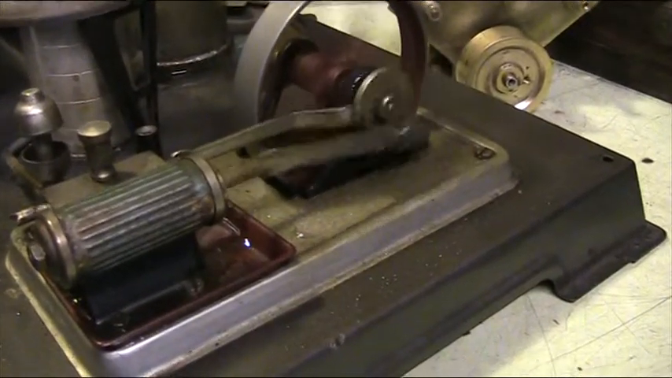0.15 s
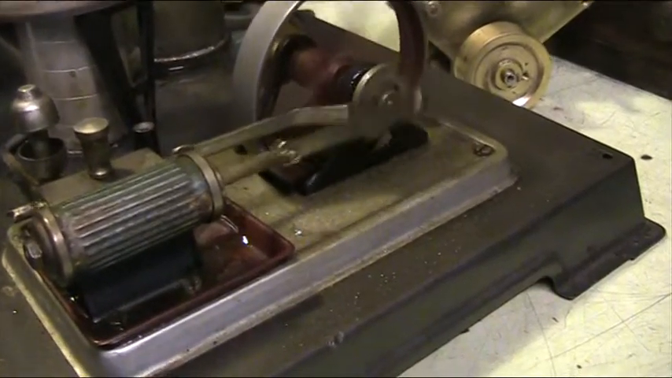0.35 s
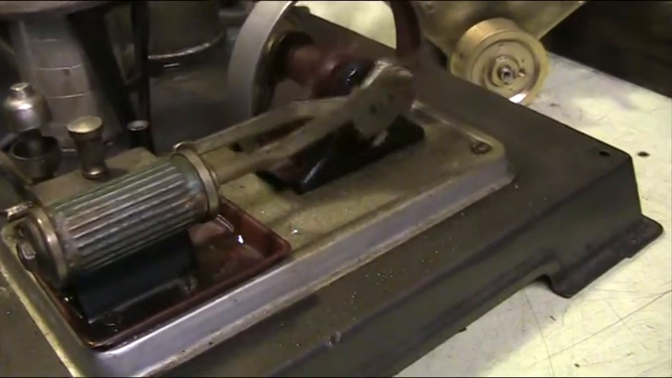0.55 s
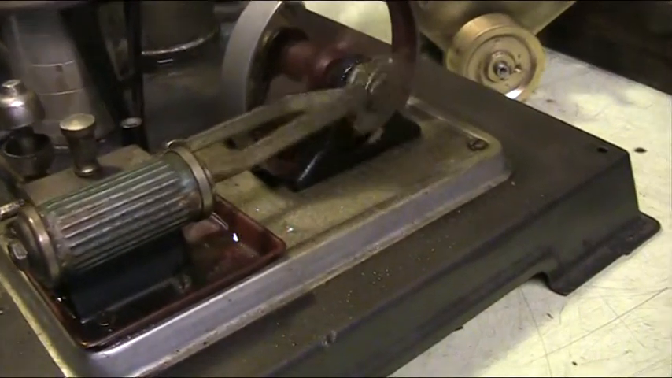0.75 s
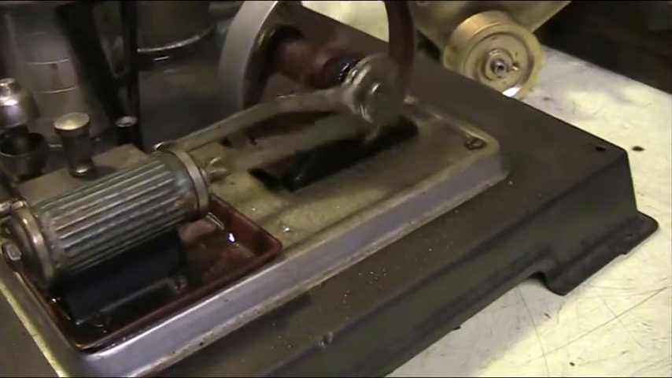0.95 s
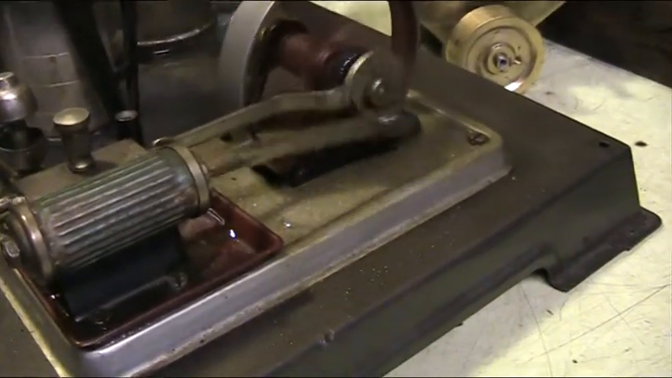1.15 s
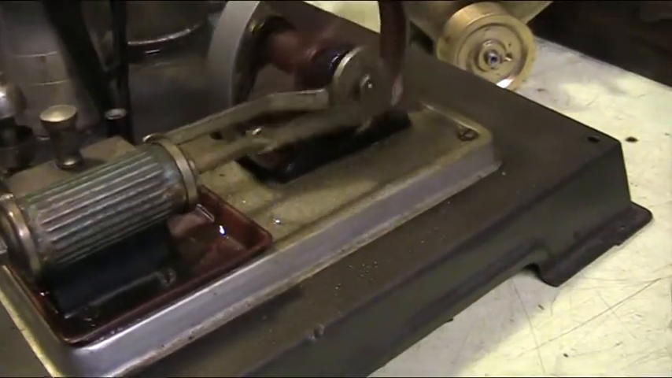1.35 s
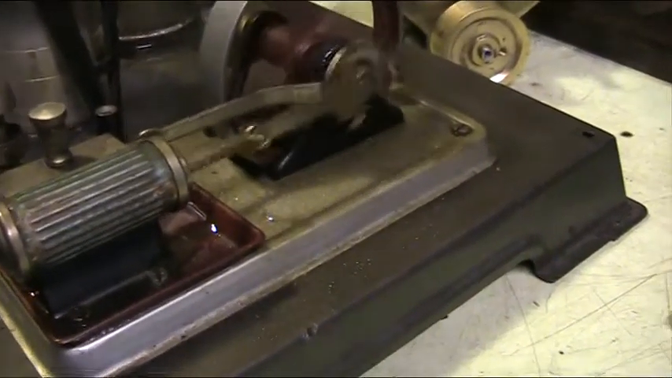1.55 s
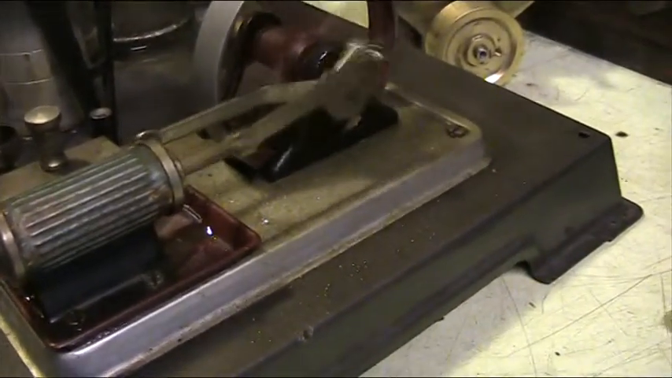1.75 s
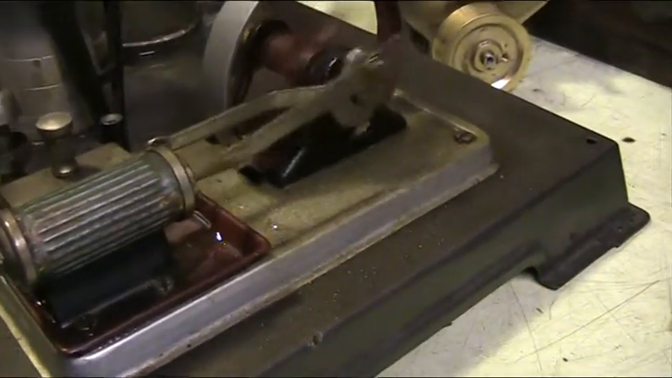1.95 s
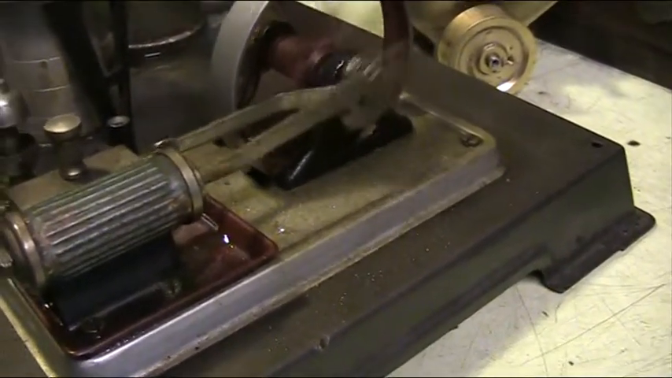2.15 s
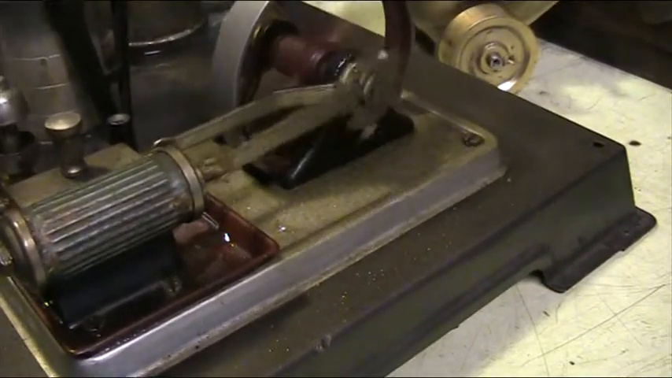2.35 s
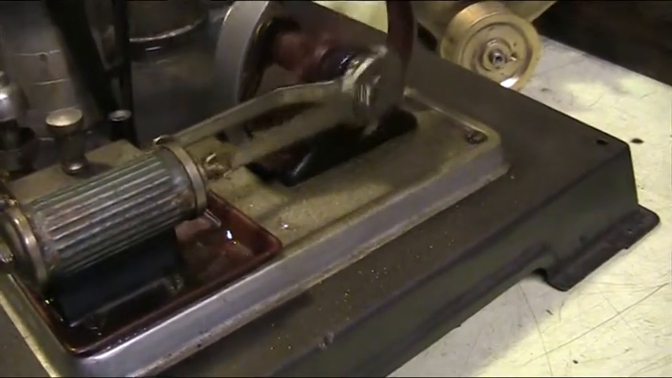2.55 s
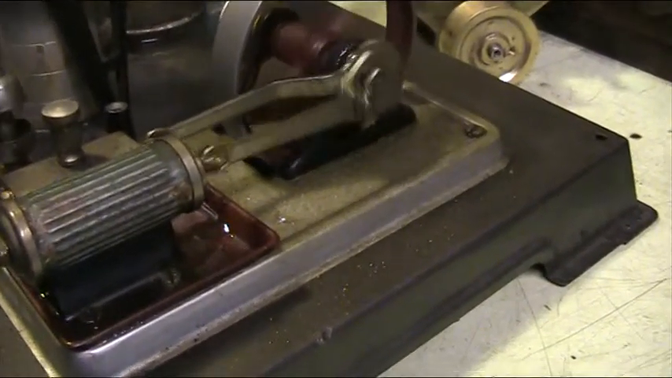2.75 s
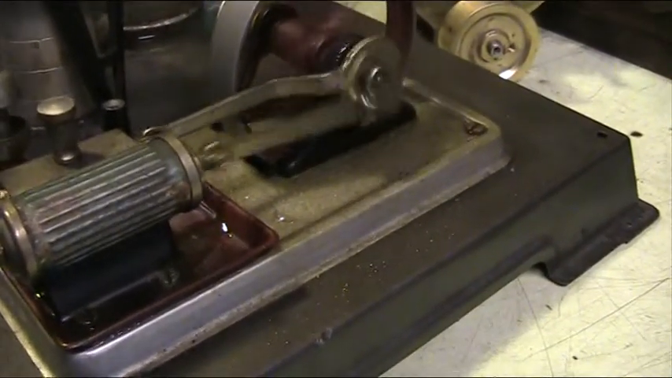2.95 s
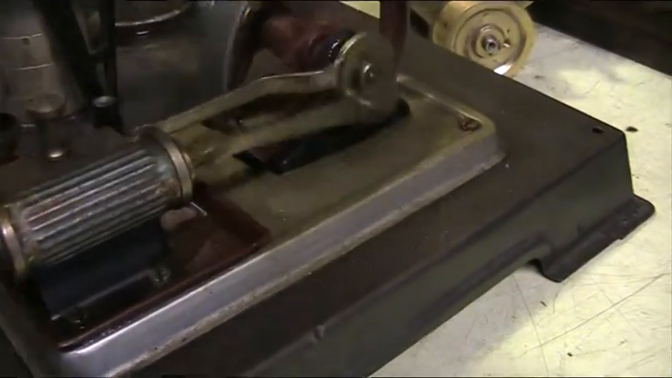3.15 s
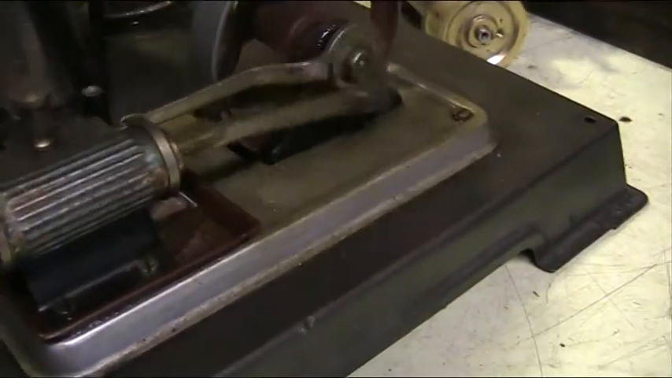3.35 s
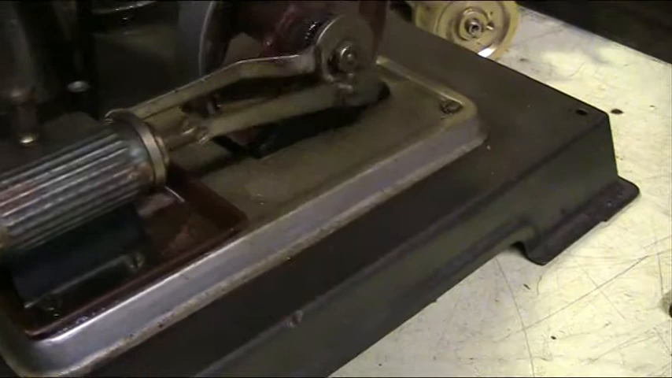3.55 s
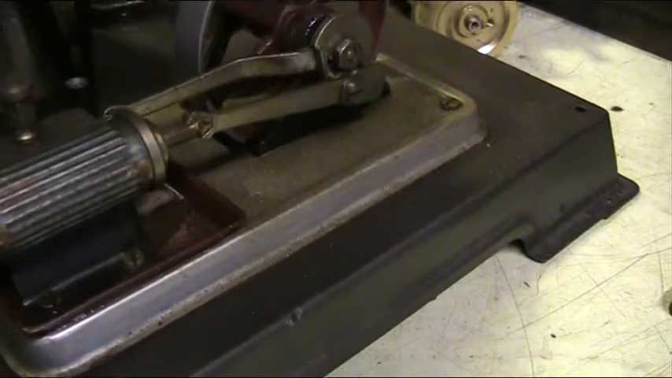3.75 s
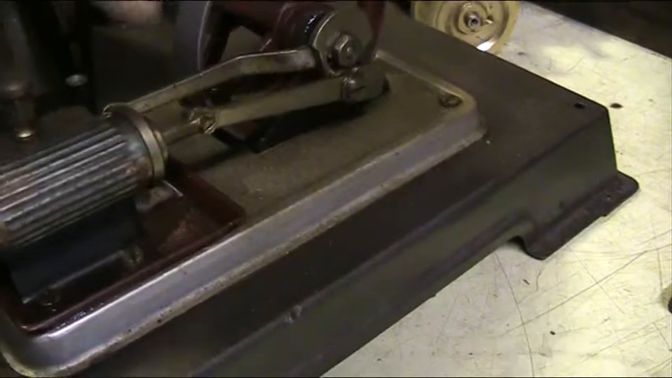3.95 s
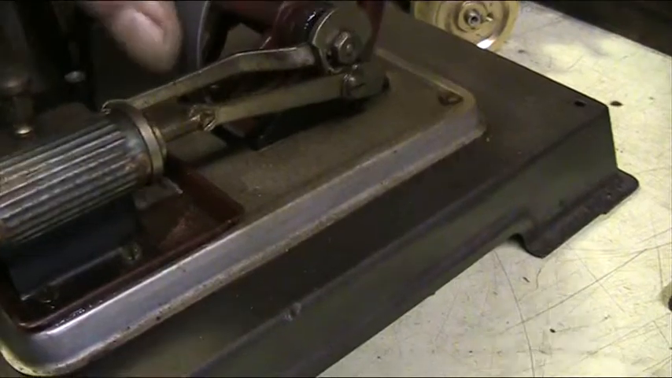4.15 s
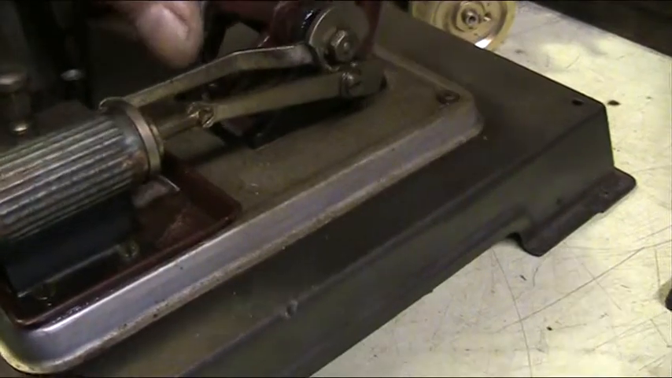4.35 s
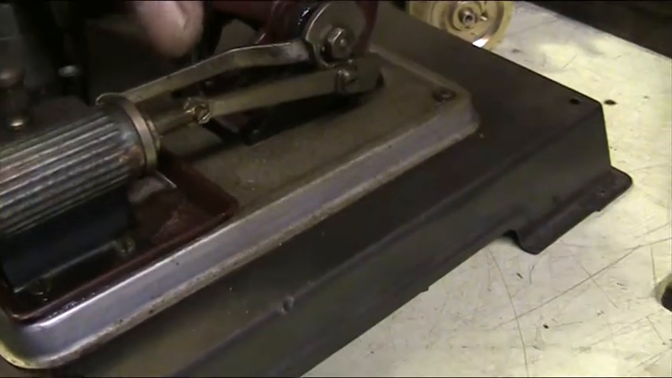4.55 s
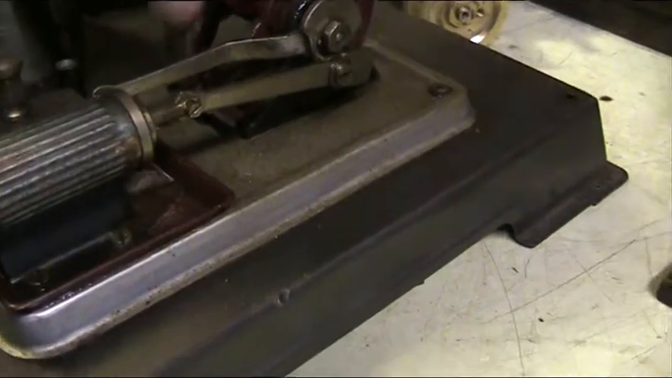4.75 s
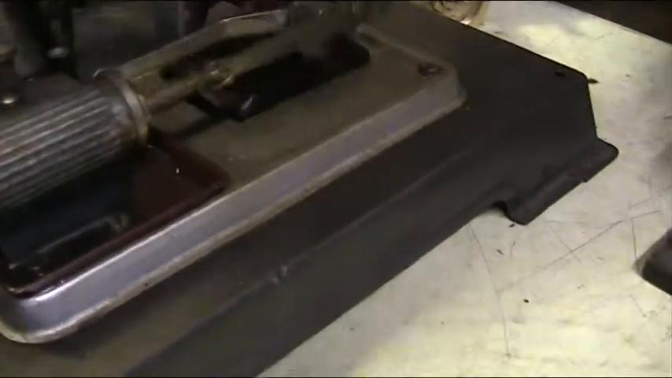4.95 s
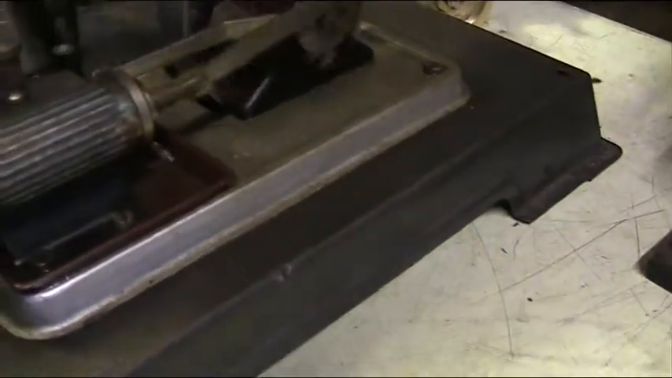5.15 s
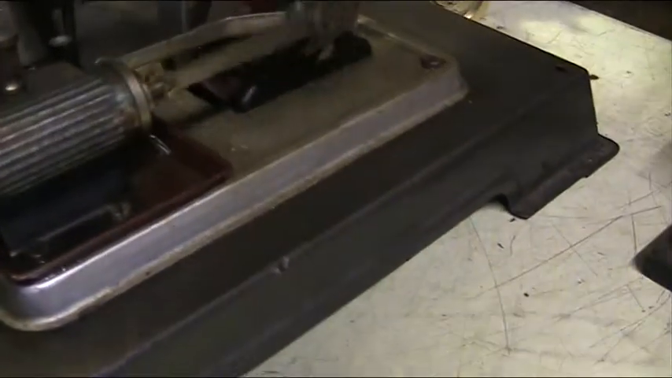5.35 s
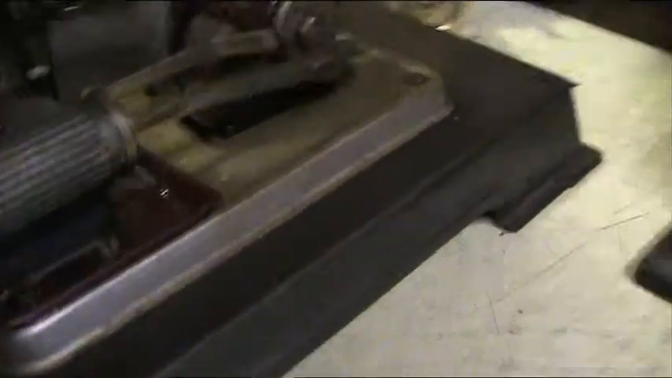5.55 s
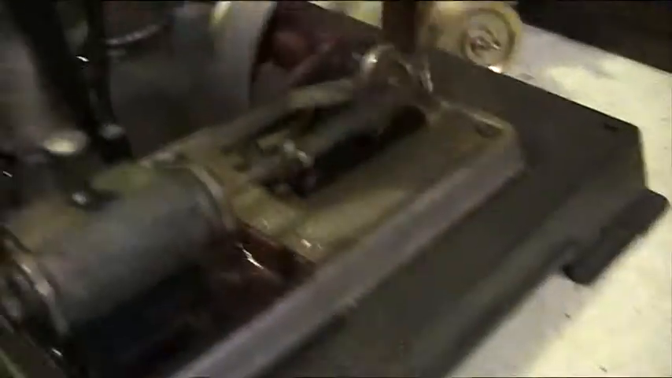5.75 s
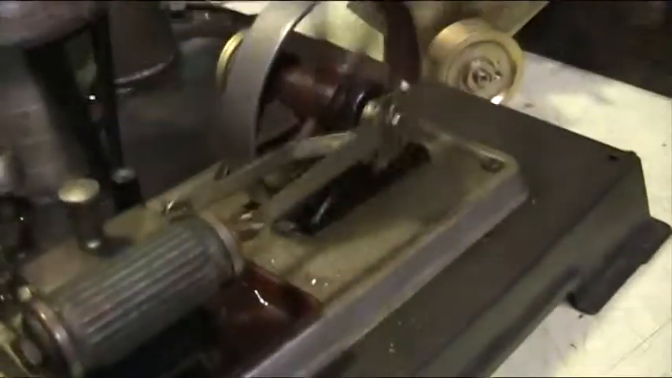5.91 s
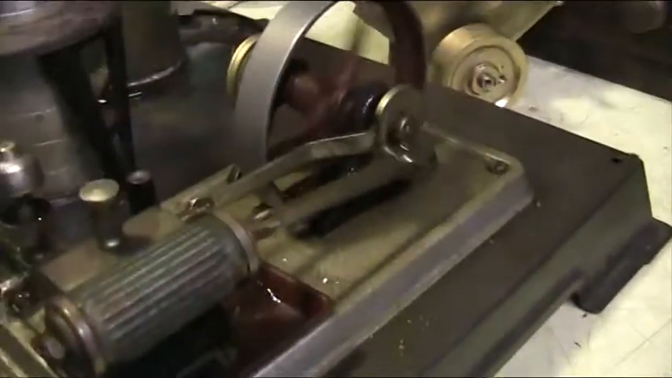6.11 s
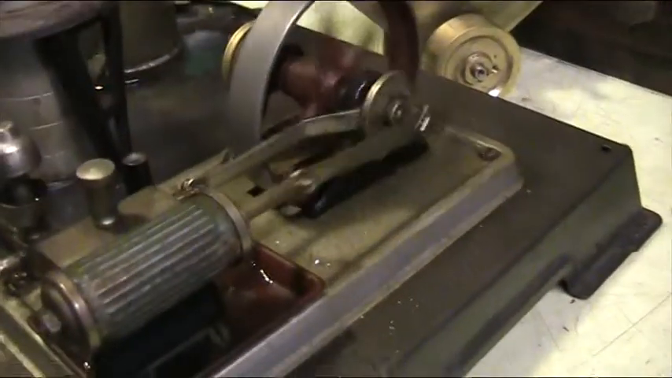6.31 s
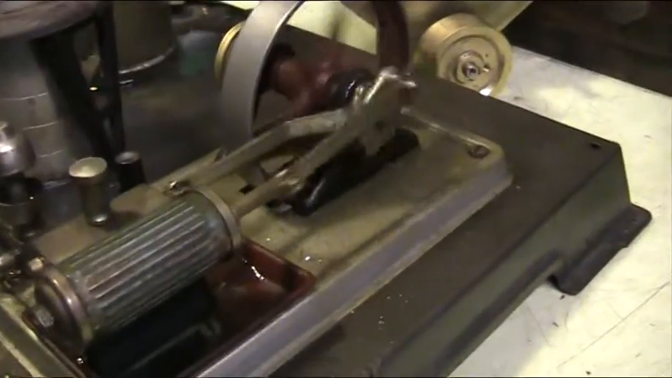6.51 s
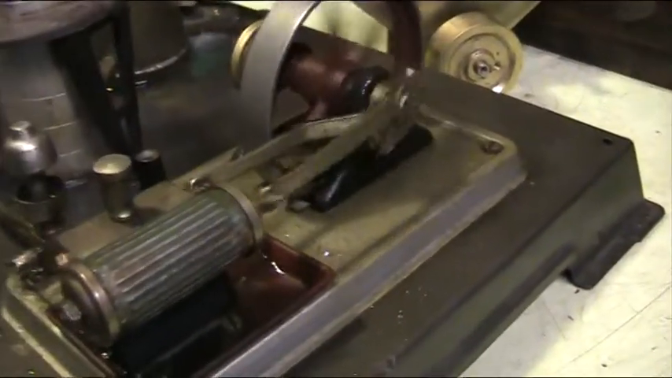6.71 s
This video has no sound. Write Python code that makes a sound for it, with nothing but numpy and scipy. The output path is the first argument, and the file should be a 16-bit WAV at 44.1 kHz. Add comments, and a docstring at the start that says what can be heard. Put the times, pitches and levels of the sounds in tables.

```python
"""A toy steam engine runs on a workbench, close to a stereo pair of microphones in a workshop.
Once a turn its crank knocks and the tin base rings and thuds. Steam hisses from the fittings
throughout; just past mid-turn the valve switches with a spurt and the port leaks until the knock.
The engine stalls after 3.5 s, is pushed on with a clack at 5 s and then runs more slowly, spitting."""
import sys
import numpy as np
from scipy import signal
from scipy.fft import rfft, irfft, next_fast_len
from scipy.io import wavfile
from scipy.ndimage import uniform_filter1d, map_coordinates

SR = 44100
rng = np.random.default_rng(int(sys.argv[2]) if len(sys.argv) > 2 else 0)


def digitize_waveform(pressure):
    """Quantize a signal to 16-bit integers and store it at the path in sys.argv[1].

    Rows of a 2-D input are taken as channels; values are limited to [-1, 1].
    """
    field = np.atleast_2d(pressure).T
    bounded = np.clip(field, -1, 1)
    quanta = np.round(bounded * 32767).astype(np.int16)
    wavfile.write(sys.argv[1], SR, quanta)


N = 298998

# one knock a turn, in relative levels: t/s, crack/dB, base ring/dB, lead-in rattle/dB
STROKES = [(0.0853, -9, -24, -21), (0.2552, -11.5, -23, -24.5), (0.4253, -7.5, -24, -31),
           (0.5925, -5.5, -22, -34), (0.758, -9, -21.5, -26), (0.9253, -13.5, -26, -22.5),
           (1.0945, -10.5, -23, -20), (1.267, -28, -26, -43), (1.4407, -11.5, -25, -20),
           (1.616, -9.5, -26.5, -23), (1.7956, -12, -22, -20.5), (1.9793, -11.5, -24, -21),
           (2.166, -12.5, -22, -19), (2.3523, -6.5, -25.5, -33), (2.5368, -9.5, -24.3, -22.5),
           (2.7244, -10, -25, -26.5), (2.9157, -5.5, -25, -26), (3.1069, -13, -26.5, -23.5),
           (3.2962, -9, -21.5, -33), (3.4879, -10, -22, -36), (5.057, -26, -26, -26.5),
           (5.3209, -26, -26, -27.5), (5.5877, -36, -25.5, -27), (5.8574, -12, -24.5, -21.5),
           (6.1225, -29, -27, -24), (6.388, -31, -25.5, -24.5), (6.655, -28, -25, -35)]
# the rod's scrape through its slack: level/dB for a brisk, a labouring and a slow turn
SLACK_DB = [-38.5, -30, -49]
SLACK_LEAD_S = .021  # the rod leaves its seat this long before the knock


def amp(db):
    """Decibels to gain."""
    return 10 ** (np.asarray(db) / 20)


def unit(x):
    """Scale to rms 1."""
    return x / np.sqrt(np.mean(x ** 2) + 1e-20)


def along(points, hz):
    """Interpolate (f/Hz, value) points on a log axis."""
    f, v = np.transpose(points)
    return np.interp(np.log(hz + 1), np.log(f + 1), v)


def clock():
    """The time of every sample."""
    return np.arange(N) / SR


def curve(points):
    """Interpolate (t/s, value) points at every sample."""
    return np.interp(clock(), *np.transpose(points))


def wobble(rate):
    """A smooth random curve, rate knots a second."""
    return map_coordinates(rng.standard_normal(int(N * rate / SR) + 4), [clock() * rate])


def fade(t60):
    """An exponential decay, a quarter second long."""
    return amp(-60 * np.arange(SR // 4) / SR / t60)


def swell(s, half_s):
    """A bell-shaped swell around time s."""
    return np.exp(-((clock() - s) / half_s) ** 2)


def add(track, s, sound):
    """Mix a sound in at time s."""
    start = max(round(s * SR), 0)
    part = track[start:start + len(sound)]
    part += sound[:len(part)]


def filtered(x, response):
    """Filter x by a response, a function of frequency."""
    m = next_fast_len(N + SR // 2)
    return irfft(rfft(x, m) * response(np.fft.rfftfreq(m, 1 / SR)), m)[..., :N]


def colour(points):
    """The response of a spectrum (f/Hz, level/dB)."""
    return lambda hz: amp(along(points, hz))


def resonant(modes):
    """The response of resonances (f/Hz, width/Hz, level/dB)."""
    return lambda hz: np.sqrt(sum(amp(db) ** 2 * (hz * w) ** 2 / ((f * f - hz * hz) ** 2 + (hz * w) ** 2)
                                  for f, w, db in modes))


def noise(response):
    """Coloured noise of rms 1."""
    return unit(filtered(rng.standard_normal(N), response))


def wide(response):
    """Stereo noise, widest in the high treble."""
    # stereo width of steady sounds: f/Hz, side re mid/dB
    width = [(60, -11), (400, -8), (1400, -13.5), (3100, -17.5), (6500, -9), (10000, -7), (15000, -2.5)]
    side = filtered(noise(response), colour(width))
    return noise(response) + np.array([side, -side])


def turns():
    """The time of each knock and the length of the turn that it ends, in seconds."""
    knock_s = [row[0] for row in STROKES]
    return zip(knock_s, np.minimum(np.diff(knock_s, prepend=-.085), .27))


def paced(values_db, turn):
    """A level for a turn of this length, between its brisk, labouring and slow values."""
    # a brisk, a labouring and a slow turn: length/s
    turn_lengths = [.17, .19, .265]
    return np.interp(turn, turn_lengths, values_db)


def running(stop_s=3.53, start_s=4.95):
    """1 while the engine turns, 0 while it stands."""
    return uniform_filter1d(1.0 * ((clock() < stop_s) | (clock() > start_s)), size=SR // 10)


def background(room_db=-49, whirr_db=-46.5, rumble_db=-60.5):
    """Room tone, the whirr of the gear while it turns, a low rumble and a few soft rubs."""
    # spectra of room tone with whirr, of the rumble and of the rubs: f/Hz, level/dB
    room_spectrum = [(25, -24), (60, 1.5), (80, -8.5), (110, 3), (220, -4), (340, -2), (520, -2),
                     (850, -3.5), (1100, -7.5), (1500, -0.5), (2500, -10.5), (6000, -24.5)]
    rumble_spectrum = [(15, -10), (26, -6), (37, 10), (55, -1), (80, -27), (200, -50)]
    rub_spectrum = [(150, -45), (420, 4.5), (600, -6), (1050, 1.5), (1500, -6), (2100, -4.5), (3500, -24),
                    (9000, -40)]
    # swells of the rumble: t/s, rise/dB, half length/s
    surges = [(.05, 11, .2), (1.6, 6, .6), (5.7, 11.5, 0.53)]
    # rubs while the engine stands: t/s, level/dB, half length/s
    rub_events = [(4.128, -43, 0.0082), (4.783, -37.5, 0.032), (4.869, -43, 0.0053)]
    room_gain = np.hypot(amp(room_db), amp(whirr_db) * running())
    room = room_gain * amp(1.3 * wobble(17)) * wide(colour(room_spectrum))
    surge_db = sum(db * swell(s, half) for s, db, half in surges)
    rumble = amp(rumble_db + surge_db) * wide(colour(rumble_spectrum))
    rubs = sum(amp(db) * swell(s, half) for s, db, half in rub_events) * noise(colour(rub_spectrum))
    return room + rumble + rubs


def workshop_echo(x):
    """The walls return a short diffuse echo, different at each microphone."""
    # decay of the room: f/Hz, t60/s
    walls = [(200, 0.093), (2000, 0.11), (12000, 0.04)]
    hz, t, spectra = signal.stft(rng.standard_normal((2, SR // 2)), SR, nperseg=256)
    tail = signal.istft(spectra * amp(-60 * t / along(walls, hz)[:, None]), SR, nperseg=256)[1]
    return signal.fftconvolve(x[None], tail / np.linalg.norm(tail[0]), axes=1)[:, :N]


def bench_reflections(x):
    """The bench and boiler throw each knock sideways."""
    # near reflections: f/Hz, side re mid/dB
    bench = [(200, -13), (1200, -45), (2300, -9.5), (5000, -10.5), (8000, -13), (14000, -11)]
    scatter = rng.standard_normal(SR // 4) * fade(0.004)
    side = filtered(signal.fftconvolve(x, scatter / np.linalg.norm(scatter))[:N], colour(bench))
    return np.array([side, -side])


def bearings():
    """The shaft rumbles in its bearings, louder the faster it turns."""
    # the turning flywheel: f/Hz, level/dB
    roll_spectrum = [(60, -37), (105, -16), (135, 4.5), (180, -1.5), (260, -2), (500, -25)]
    speed = sum(swell(s - turn / 2, 0.4 * turn) / turn for s, turn in turns())
    return amp(-65.5) * speed * wide(colour(roll_spectrum))


def droplets(hiss, depth_db):
    """Droplets in the openings lift and drop narrow bands of a hiss."""
    spectra = signal.stft(hiss, nperseg=512)[2]
    patches = uniform_filter1d(rng.standard_normal(spectra.shape[1:]), size=3, axis=0)
    patches = uniform_filter1d(patches, size=40, axis=1)
    return unit(signal.istft(spectra * amp(depth_db * unit(patches)), nperseg=512)[1][:, :N])


def valve():
    """Each turn the valve spurts and spits, shuts for an instant, then opens the port until the knock."""
    # each for a brisk, a labouring and a slow turn: relative level/dB
    leak_levels = [-38.5, -36.5, -36.5]  # steam through the open port
    sizzle_levels = [-45, -46, -64]  # the port's thin, high note
    spray_dips = [-3, -8, -6]  # the spray while the port is open
    spurt_rises = [6, 6.5, 7]  # the whistle as the valve switches
    spit_levels = [-5, -5, 5]  # spat water, re the spray
    port, leak, sizzle, spurt_db, spit, duck_db, shut = np.zeros((7, N))
    for s, turn in turns():
        opening = 1 / (1 + ((clock() - s + .19 * turn) / (0.18 * turn)) ** 16)
        switch_s = s - 0.428 * turn
        port += opening
        leak += amp(paced(leak_levels, turn)) * opening
        sizzle += amp(paced(sizzle_levels, turn)) * opening
        duck_db += paced(spray_dips, turn) * opening
        spurt_db += paced(spurt_rises, turn) * swell(switch_s, half_s=0.0072)
        spit += amp(paced(spit_levels, turn)) * swell(switch_s + 0.0047, half_s=.009)
        shut += swell(s - 0.39 * turn, half_s=0.0028)
    return port, leak, sizzle, spurt_db, spit, duck_db, shut


def whistling_jet(port, spurt_db):
    """A steam jet whistles, stepping up in pitch while the port is open."""
    # resonances of the jet: f/Hz, width/Hz, level/dB
    jet_modes = [(1650, 99, -15), (3180, 203, 0), (3480, 250, -13), (4004, 190, 0), (5746, 255, 7),
                 (6000, 160, -8)]
    # strength of the jet: t/s, relative level/dB
    jet_levels = [(0.0, -41.5), (1.0, -42), (1.45, -45), (1.98, -42.5), (3.1, -42.5), (3.49, -48),
                  (4.04, -44.5), (4.38, -42.5), (5.19, -42), (5.32, -44.5), (5.78, -45.5), (5.95, -43.5),
                  (6.78, -44)]
    lift_db = 1.13 * (1 - running())  # the jet whistles slightly louder while the engine stands
    jet_db = curve(jet_levels) + 2.4 + lift_db - 0.5 * port + spurt_db
    share = np.clip(0.67 * port, 0, 1)
    whistle = np.sqrt(1 - share) * wide(resonant(jet_modes))
    whistle += np.sqrt(share) * wide(resonant([(6240, 300, 9), (3260, 1200, -18.0)]))
    return amp(jet_db + 1.54 * wobble(45)) * droplets(whistle, depth_db=1.5)


def port_leak(leak, sizzle):
    """Steam chuffs through the open port with a thin, high note."""
    # escaping steam: f/Hz, level/dB
    leak_spectrum = [(500, -3), (2000, 7.5), (4000, 7), (4750, 4.5), (5600, 6), (7000, 6.5), (9300, 4.5),
                     (10600, 4), (13000, -12)]
    # resonances of the port and of its high note: f/Hz, width/Hz, level/dB
    port_modes = [(3140, 940, -3.5), (4040, 210, -0.5), (5500, 310, 1.5), (6010, 290, 3.5),
                  (7300, 730, -3.5), (8670, 350, 0), (9450, 780, -4.5)]
    sizzle_modes = [(11070, 610, 0)]
    blowout_db = 4 * swell(5.5, half_s=0.35)  # backed-up steam clears after the restart
    chuff_gain = leak * amp(blowout_db - 1.54 + 2.1 * wobble(120))
    chuff = droplets(wide(lambda hz: resonant(port_modes)(hz) * colour(leak_spectrum)(hz)), depth_db=2.2)
    note = droplets(wide(lambda hz: resonant(sizzle_modes)(hz) ** 2), depth_db=2.2)
    return chuff_gain * chuff + sizzle * note


def steam(shut_db=-5.5):
    """A jet and a fine spray hiss throughout; late in each turn the port takes some of their steam."""
    # spectra of the fine spray and of spat water: f/Hz, level/dB
    spray_spectrum = [(1500, -11), (2700, 6.5), (4800, -3.5), (6600, -13), (8100, 0.5), (8700, 5),
                      (9050, 2), (9450, 5), (9900, -1), (10700, 8.5), (11300, 5.5), (12100, 2),
                      (13000, -2.5), (14500, -10), (16000, -9)]
    spit_spectrum = [(1500, -27), (3500, 6.5), (7000, -13), (10000, 12), (12500, 8), (16000, -14)]
    # strength of the spray: t/s, relative level/dB
    spray_levels = [(0.0, -43.5), (1.58, -47), (2.15, -44.5), (3.64, -45), (4.12, -42), (4.97, -46.5),
                    (5.72, -37.5), (6.78, -42.5)]
    spray_db = curve(spray_levels)
    port, leak, sizzle, spurt_db, spit, duck_db, shut = valve()
    jet = whistling_jet(port, spurt_db)
    spray_gain = amp(spray_db + 1.86 + duck_db + 1.54 * wobble(25))
    spray = spray_gain * droplets(wide(colour(spray_spectrum)), depth_db=2.5)
    hiss = jet + spray + port_leak(leak, sizzle)
    water = spit * amp(spray_db + 1.8 * wobble(400)) * wide(colour(spit_spectrum))
    return amp(shut_db * shut) * hiss + water  # the hiss dips while the valve covers the port


def crack(snap_hz, snap_s, snap_db, tail_db, tail_t60):
    """Steel meets brass: a snap of a few cycles, then a short dense ring."""
    # the dense ring: f/Hz, level/dB
    ring_spectrum = [(300, -35), (900, -9), (1300, -18), (2500, -7.5), (3700, -1), (4600, -11.5),
                     (5400, 2.5), (6200, -4), (7200, -4.5), (9000, -9), (12000, -26), (16000, -28)]
    t = np.arange(SR // 4) / SR
    pitch = snap_hz * np.exp(rng.normal(0, .07))
    snap = (t / snap_s) ** 4 * np.exp(4 - 4 * t / snap_s) * np.sin(2 * np.pi * (pitch * t + rng.random()))
    response = colour(ring_spectrum)(np.fft.rfftfreq(len(t), 1 / SR))
    grain = unit(irfft(rfft(rng.standard_normal(len(t))) * response, len(t)))
    return amp(snap_db) * snap + grain * (0.74 * fade(0.0028) + amp(tail_db) * fade(tail_t60))


def linkage_ticks(over_scrape_db=11.5):
    """Loose joints tick as the rod leaves its seat before each knock; a few single ticks stand out."""
    # single louder ticks, just before a knock, at the valve's switch or between: t/s, relative level/dB
    single_ticks = [(1.7759, -18), (1.9594, -13.5), (2.2897, -7.5), (2.8897, -17), (5.24, -19.5),
                    (5.4695, -13), (5.6155, -25), (5.7318, -15.5)]
    out = np.zeros(N)
    unseatings = [(s - SLACK_LEAD_S, paced(SLACK_DB, turn) + over_scrape_db) for s, turn in turns()]
    for s, db in unseatings + list(single_ticks):
        add(out, s, amp(db - 7) * crack(snap_hz=5000, snap_s=.0002, snap_db=-3, tail_db=-4, tail_t60=.03))
    return out


def push(wheel_hz=3180, wheel_db=-43, wheel_t60=4.1):
    """A push frees the crank with a clack and leaves the flywheel ringing."""
    # impacts of the clack: t/s, level/dB, t60/s
    impacts = [(4.9726, -6, 0.0055), (4.9755, -11.5, .02), (4.981, -20, 0.17)]
    # their spectrum: f/Hz, level/dB
    clack_spectrum = [(300, -15), (1300, -11.5), (3200, -6.5), (4200, -3), (5000, -9), (5700, 6.5),
                      (6900, -6), (7800, -24), (11000, -11.5), (13000, -40)]
    clack = np.zeros(N)
    for s, db, t60 in impacts:
        add(clack, s, amp(db) * fade(t60))
    age = clock() - impacts[0][0]
    wheel = (age > 0) * amp(wheel_db - 60 * abs(age) / wheel_t60) * noise(resonant([(wheel_hz, 90, 0)]))
    return clack * noise(colour(clack_spectrum)) + wheel


def base_ring():
    """Neighbouring modes of the tin base start in opposite phase, so the ring swells and beats."""
    # modes of the base: f/Hz, level/dB, t60/s
    modes = [(249.6, -12.5, 0.073), (431, -15.5, 0.14), (677.7, -16.5, 0.15), (793, -11, 0.067),
             (884, -8.5, 0.06), (1271, -7, 0.085), (1355, -8, 0.13), (1492, 5, 0.051), (1590, 4, 0.074),
             (1663, -1.5, 0.067), (1758, -1.5, 0.032), (1948, -9, 0.087), (2083, -8, 0.067),
             (3150, -3.5, 0.043), (4020, -3.5, 0.032), (6800, -45, .15), (7500, -19, 0.21)]
    t = np.arange(SR // 4) / SR
    detune = 1 + rng.normal(0, .009)
    spread_db = rng.normal(0, 1.8, len(modes))
    return sum((-1) ** k * amp(db + spread_db[k]) * fade(t60) * np.sin(2 * np.pi * hz * detune * t)
               for k, (hz, db, t60) in enumerate(modes))


def thud(hz, rise_s, length_s):
    """The low thud of a stroke: a few rounded cycles that stop short."""
    t = np.arange(SR // 4) / SR
    return np.sin(2 * np.pi * hz * t) * (1 - np.exp(-t / rise_s)) / (1 + (t / length_s) ** 12)


def crank_knocks():
    """The rod scrapes through its slack, rattles, then strikes home and shakes the base."""
    # the rod's rattle: f/Hz, level/dB
    rattle_spectrum = [(300, -8.5), (900, -2.5), (1500, 9.5), (2500, 0.5), (3600, 5), (5500, -1.5),
                       (7000, -10.5), (10000, -10), (16000, -16)]
    out, rattle = np.zeros((2, N))
    for (_, crack_db, ring_db, lead_db), (s, turn) in zip(STROKES, turns()):
        slack_db = paced(SLACK_DB, turn)
        add(rattle, s - SLACK_LEAD_S, amp(slack_db) * fade(0.15))
        add(out, s - .019, amp(slack_db - 6) * base_ring())
        add(rattle, s - .006, amp(lead_db) * fade(0.049))
        strike = crack(snap_hz=5100, snap_s=0.00041, snap_db=2.5, tail_db=-13.0, tail_t60=0.038)
        add(out, s, amp(crack_db) * strike)
        add(out, s, amp(ring_db - 1.5) * base_ring())
        add(rattle, s, amp(ring_db - 7) * fade(0.093))
        thud_db = -22.5 + 0.56 * ring_db + 0.15 * crack_db
        add(out, s, amp(thud_db) * thud(hz=180.3, rise_s=0.0088, length_s=0.039))
        # the slack closes again, softly, on the way back
        add(out, s + turn * rng.uniform(0.35, .44), amp(ring_db - 24.5) * base_ring())
    rattle = uniform_filter1d(rattle, size=SR // 500)  # the chatter builds over two milliseconds
    return out + rattle * amp(1.36 * wobble(700)) * noise(colour(rattle_spectrum))


def scene():
    """The engine and its steam close up, the workshop faint behind."""
    engine = crank_knocks() + linkage_ticks() + push()
    reflections = bench_reflections(engine) + amp(-22.5) * workshop_echo(engine)
    return engine + reflections + bearings() + steam() + background()


def record(dry, ceiling=.95, top_hz=16000):
    """Two close microphones hear the treble out of phase; peaks are rounded off, the band is limited."""
    # the microphone pair: f/Hz, side re mid/dB
    mic_side = [(200, -43), (2000, -14.5), (5000, -26.5), (7000, -7), (10000, -12), (11800, 3.5),
                (15000, -6)]
    side = filtered(dry.mean(axis=0), lambda hz: 1j * colour(mic_side)(hz))
    pair = (dry + np.array([side, -side])) * amp([[-.3], [.3]])
    rounded = pair / (1 + abs(pair / ceiling) ** 6) ** (1 / 6)
    return filtered(rounded, lambda hz: hz < top_hz)


dry = scene()
out = record(dry)
digitize_waveform(out)
```